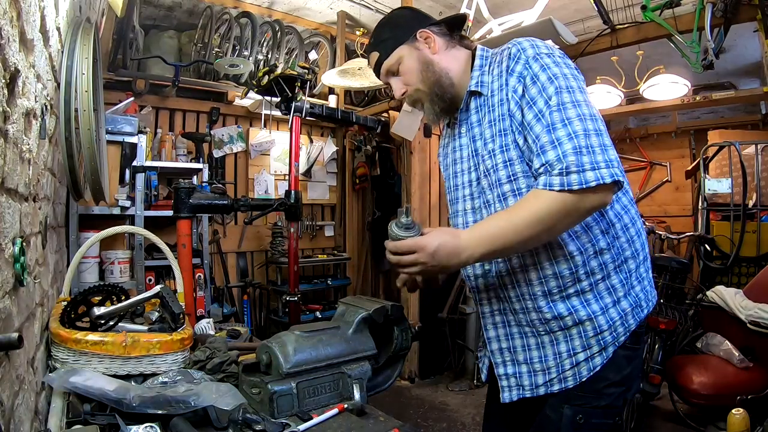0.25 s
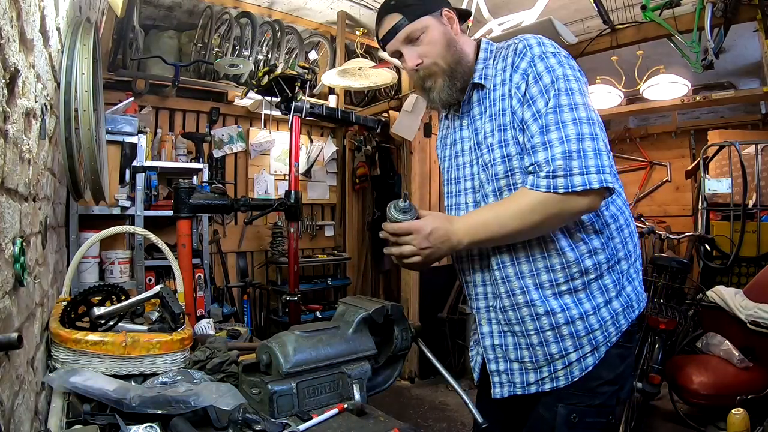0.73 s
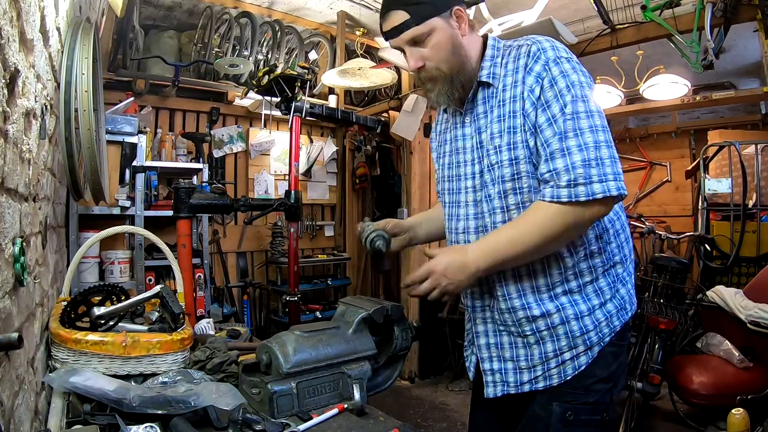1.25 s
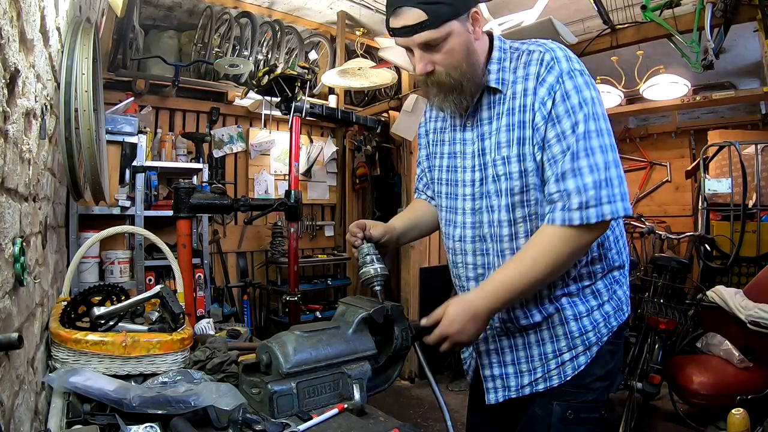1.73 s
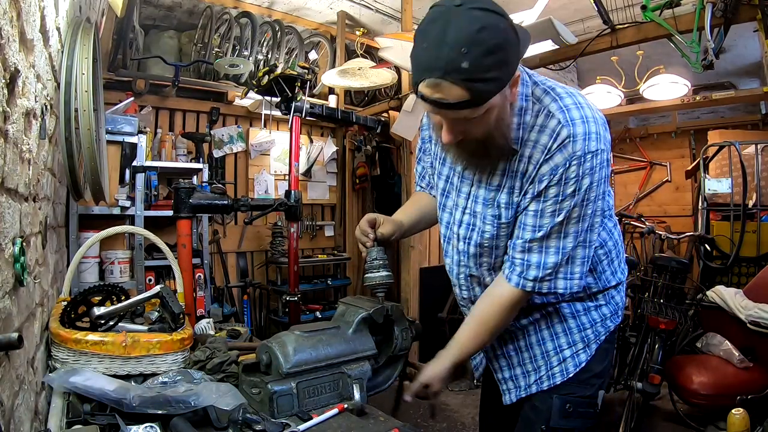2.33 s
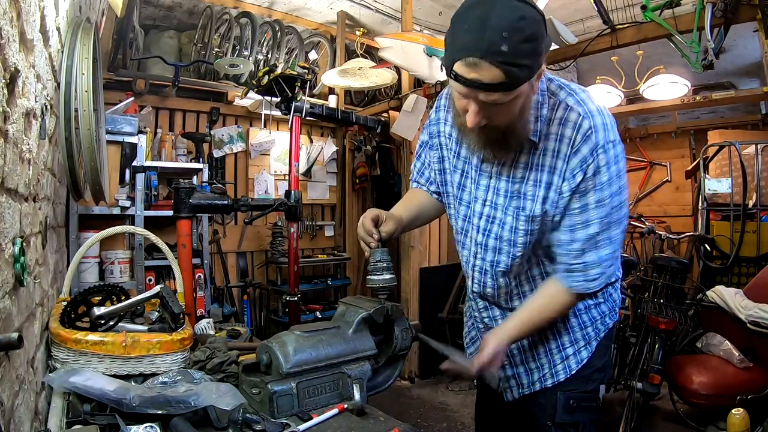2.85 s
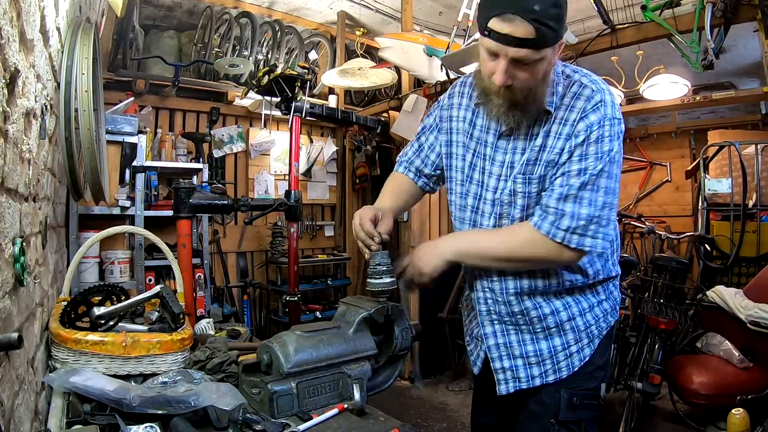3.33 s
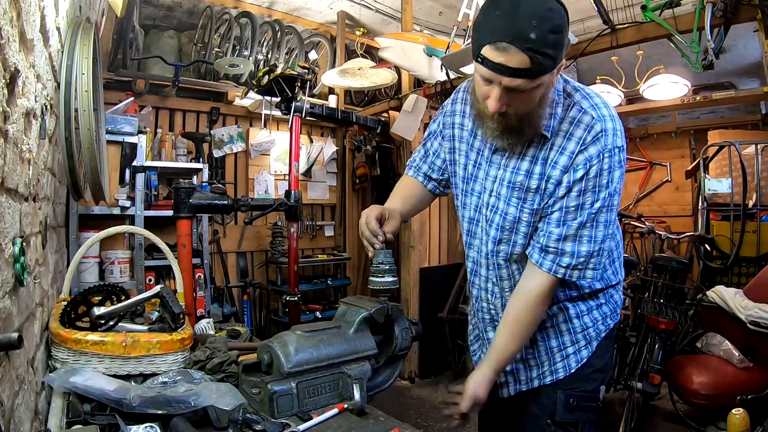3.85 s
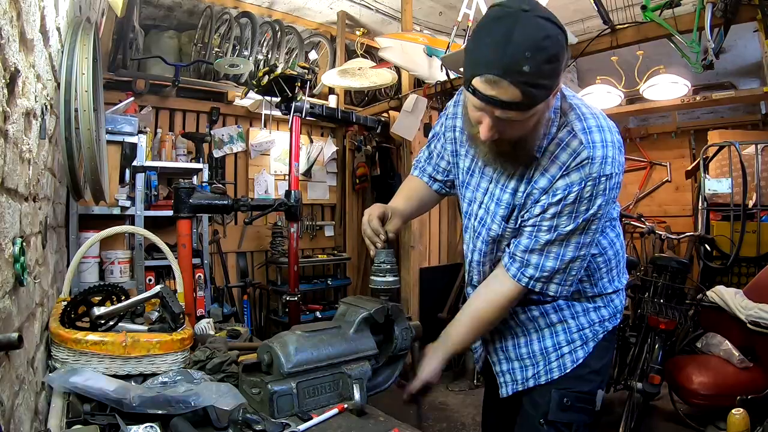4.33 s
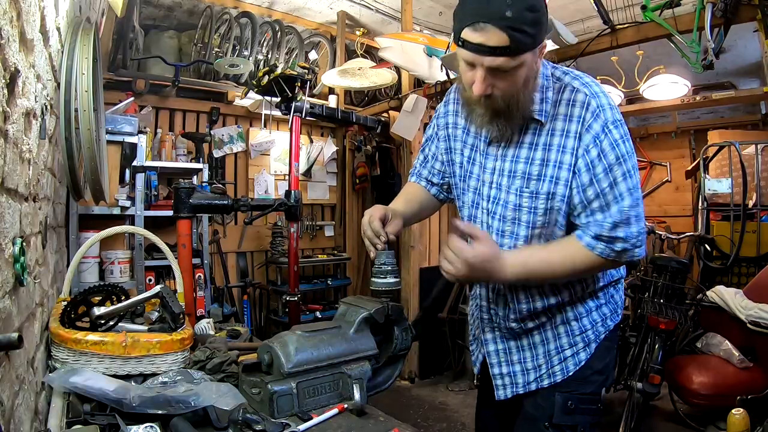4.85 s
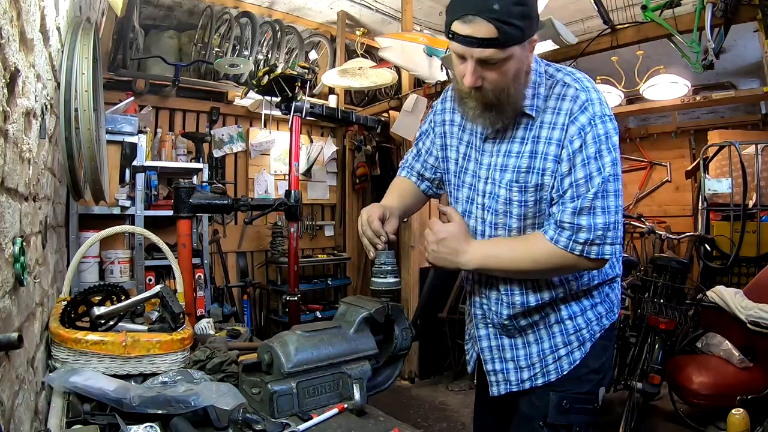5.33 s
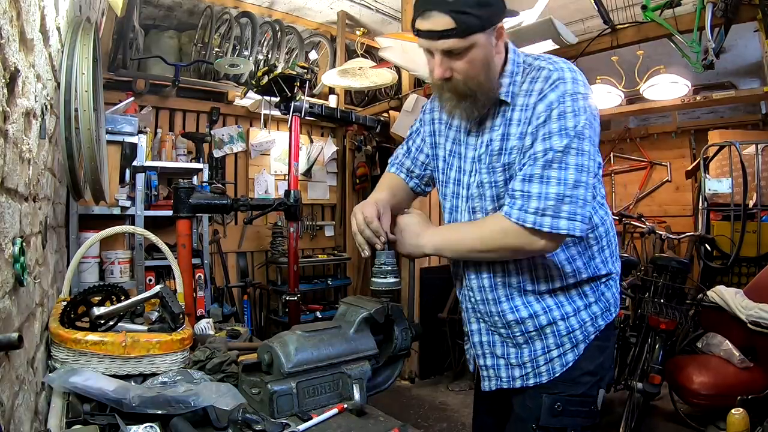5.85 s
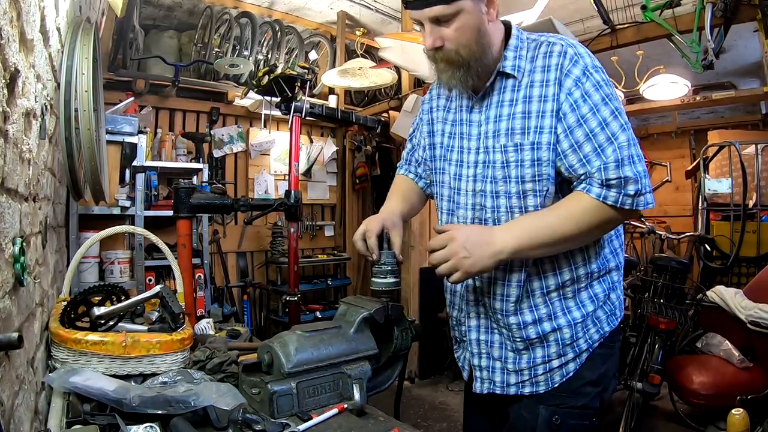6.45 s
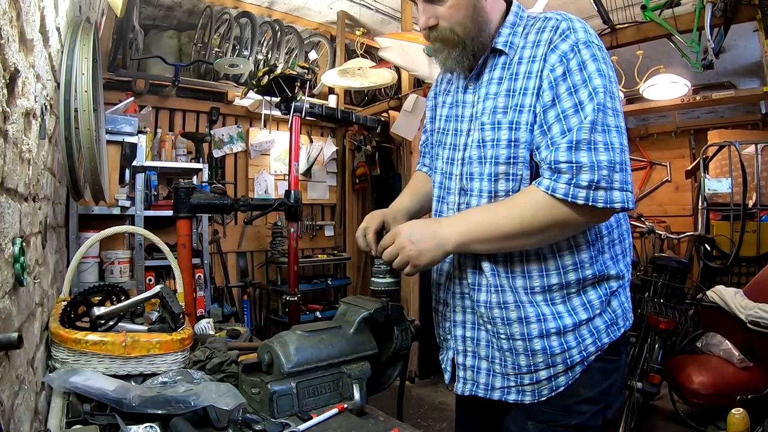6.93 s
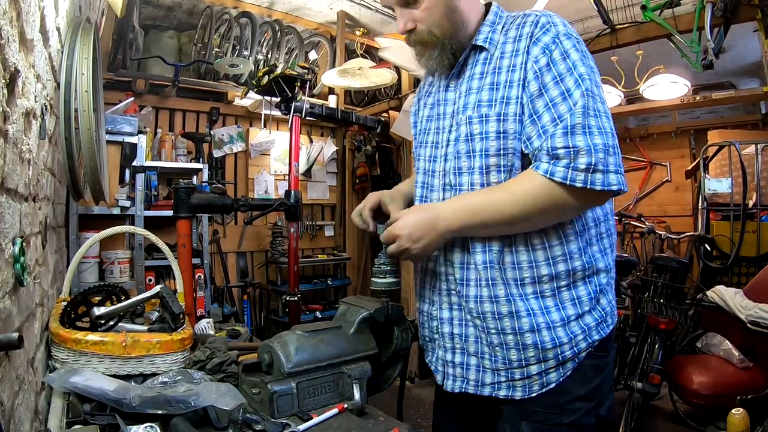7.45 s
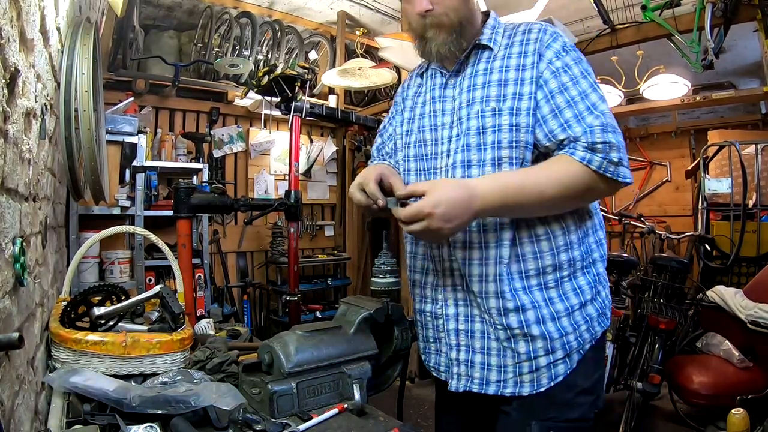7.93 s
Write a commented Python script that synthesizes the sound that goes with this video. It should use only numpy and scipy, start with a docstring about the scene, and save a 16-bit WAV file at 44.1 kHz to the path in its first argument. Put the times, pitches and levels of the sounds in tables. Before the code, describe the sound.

A bench vise is cranked by hand in a small wooden workshop, the metal near and slightly right. Light steel knocks come at the start, 0.3, 0.7 and 1.8 seconds. Knocks and low bench thumps build to a sharp, ringing clank at 2.6 seconds. A small gear part tinks at 3.3, then the sliding handle scrapes and rattles loudly around 3.5 while the screw grinds dully. Tiny clinks, soft bumps and faint palm and sleeve rubbing follow. One hard, damped clank with a short scrape lands at 5 seconds. After more tinks near 6, the biggest cluster of clanks, scraping and bright ringing runs from 6.2 to 6.4, shaking the bench and leaving a brief, fading low tone. A light click at 7 seconds and a few soft taps and rubs finish. A faint room hiss lies underneath, dipping after loud blows.

```python
"""Steel clanks, rings and scrapes as a bench vise is cranked by hand in a small wooden workshop.
The sliding handle bar strikes, rattles the casting, scrapes through its eye and shakes the bench,
while loose gear parts tink in the other hand. Palm and sleeve rub; the screw grinds dully.
A faint room hiss sinks after loud blows, as under automatic gain."""
import sys
import numpy as np
from scipy import signal
from scipy.fft import rfft, irfft, next_fast_len
from scipy.io import wavfile
from scipy.ndimage import map_coordinates

SR = 44100
rng = np.random.default_rng(int(sys.argv[2]) if len(sys.argv) > 2 else 0)


def transcribe(u):
    """Save the signal u as a 16-bit wav file named by the first command-line argument.

    u: samples, shape (n,) or (channels, n), limited to [-1, 1]; the rate is SR.
    q: integer samples, one column per channel.
    """
    v = np.clip(np.atleast_2d(u).T, -1, 1)
    q = np.round(v * 32767).astype(np.int16)
    wavfile.write(sys.argv[1], SR, q)


N = 361619

# bar strikes: (time [s], crack [dB], casting [dB], wood [dB], ring [dB], place struck [bar lengths])
STRIKES = [(0.0024, -23.5, -27, -29.5, -30.5, 0.3), (0.3294, -26.0, -23.5, -28.5, -27.5, 0.35),
           (0.7207, -26.5, -27, -37, -37, 0.36), (1.8286, -21, -27.5, -31, -32, 0.31),
           (2.2507, -23.5, -28.5, -26.5, -43.5, 0.49), (2.4185, -29, -19.5, -26.5, -50.5, 0.14),
           (2.591, -10, -13.5, -19.5, -15.5, 0.074), (3.0876, -46, -26, -37.5, -39, 0.31),
           (3.2177, -51.5, -36.5, -40, -50.5, 0.1), (3.2555, -50, -29.5, -48.5, -41, 0.082),
           (3.3622, -23.5, -27, -43, -33.5, 0.48), (3.3887, -41.5, -24.5, -35.5, -43.5, 0.42),
           (3.4814, -27.5, -18, -34, -23, 0.49), (3.491, -16.5, -13, -25.5, -16.5, 0.24),
           (3.5094, -18.5, -12, -23.0, -17.5, 0.38), (3.5295, -19, -17.5, -19.5, -18.5, 0.36),
           (3.569, -14.5, -15.5, -17, -18.5, 0.19), (3.5935, -29, -26.5, -27.5, -22.5, 0.325),
           (3.6309, -38.5, -27.5, -26, -42, 0.35), (4.8057, -33, -31.5, -37.0, -52, 0.2),
           (5.0464, -15.5, -8.5, -19.5, -31, 0.28), (5.0753, -28, -26, -29.5, -52.5, 0.5),
           (6.1161, -52, -31.5, -33.5, -52, 0.27), (6.1575, -34.5, -21, -35.5, -36.5, 0.49),
           (6.1921, -26.5, -14, -23, -42.5, 0.24), (6.2136, -24.5, -11.5, -22, -33.5, 0.49),
           (6.2277, -14, -13.0, -30.5, -23.5, 0.18), (6.2591, -13.5, -13.5, -24.5, -21, 0.5),
           (6.3004, -23, -11, -26, -18, 0.045), (6.322, -16.5, -20, -28, -24.5, 0.215),
           (6.3788, -8.5, -16.5, -18.5, -20.5, 0.097), (6.3985, -32, -25, -37, -16.5, 0.075)]
# dull contacts, bar held still: (time [s], crack [dB], casting [dB], wood [dB])
HELD_BUMPS = [(0.0997, -35, -35.5, -35.5), (0.4194, -38.5, -35.5, -36.5), (1.1637, -65, -48.5, -55),
              (1.1961, -61, -46, -53), (1.3313, -44, -32.5, -32), (1.5788, -74, -48.5, -57),
              (1.7804, -46, -43, -40.5), (1.9235, -48, -35, -29), (2.2988, -47, -34.5, -31.5),
              (3.046, -46.5, -50, -51), (3.705, -46, -29.5, -25.5), (4.2215, -44.5, -53, -64),
              (4.3187, -46, -40.5, -43), (4.4388, -38.5, -35, -33), (4.4544, -38, -35, -26.5),
              (4.5486, -44, -34, -35.5), (4.8678, -40.5, -40.5, -45.5), (4.9541, -61, -47.5, -40),
              (5.7013, -52.5, -45, -47), (5.7435, -46.5, -36, -28.5), (5.7832, -43, -33.5, -38.5),
              (5.8062, -37, -31.5, -33), (6.025, -40, -27.5, -31), (6.0703, -43.5, -29, -30),
              (6.6297, -50.5, -39.5, -43), (7.0191, -25.5, -44, -48), (7.209, -52, -53, -57),
              (7.3143, -46.5, -45, -48.5), (7.3302, -43, -36, -40.5), (7.451, -45, -45.5, -56),
              (7.4798, -44.5, -47, -56), (7.99, -60.5, -67, -62)]
# modes of bench, casting and bar: (frequency [Hz], relative level [dB], t60 [s])
VISE_MODES = [(236.2, -11, 0.22), (305, -20, 0.43), (371, -23, .15), (483.4, 0, .2), (710, -6.5, 0.15),
              (1065, -13, 0.13), (1323, -8.5, 0.17), (1393, -10.5, 0.12), (1672, -11, 0.18),
              (1900, -22, 0.091), (2396, -11, 0.24), (3070, 0.5, 0.23), (3230, -4, 0.09), (3590, -9, 0.21),
              (3655, -9.5, 0.26), (5050, 5, 0.19), (5140, -9, 0.26), (5340, -9.5, .35), (6030, -10.5, 0.36),
              (7170, -12, 0.3), (7385, 6, 0.21), (7492, -1.5, 0.32), (8640, -18, .2), (10116, 8.5, 0.24),
              (13160, -9.5, .26), (13920, -6, .3)]
# noise spectra of steel contact, casting rattle, light friction: (frequency [Hz], density [dB])
CRACK_SPECTRUM = [(1180, -37), (2000, -19.5), (3110, -8.5), (4560, -7.5), (5140, -4), (7590, -9.5),
                  (9000, -27.5), (11700, -64), (19800, -120)]
CASTING_SPECTRUM = [(470, -31.5), (800, -6.5), (884, -3), (1130, -3), (1430, 0.5), (1710, -3), (2280, -9),
                    (2470, -13), (2750, -11), (3000, -12.5), (3900, -27), (6600, -120)]
FRICTION_SPECTRUM = [(710, -45), (1200, -5), (2310, 1), (3820, -0.5), (6050, 3.5), (8710, -7), (10400, -8),
                     (14300, -32), (15500, -49.5)]
# phase lead of the left channel: (frequency [Hz], lead [rad])
LEFT_LEAD = [(0, 0), (1030, 0.5), (4220, -0.5), (6030, 1.5), (7670, 1.5), (9820, 6.5), (15200, 4)]
PAN_DB = -2  # left minus right: the metal sits to the right


def vise():
    """Each contact cracks, rattles the casting and knocks the wood; a free bar also rings."""
    # spectra of steel snap, hollow wood, low knock: (frequency [Hz], density [dB])
    snap_spectrum = [(6000, -43), (8500, 2), (10500, 5), (13000, -21.5), (15600, -26.5)]
    hollow_spectrum = [(240, -32), (400, -7), (448, 0.5), (506, -2), (602, -9), (714, 0.5), (800, -11.5),
                       (1040, -43), (1760, -120)]
    knock_spectrum = [(82, -31.5), (140, -0.5), (329, -1), (420, -7), (550, -31.5), (920, -120)]
    times, crack_db, casting_db, wood_db = contacts()
    snap_db = crack_db - 25.5 + 0.89 * (crack_db - casting_db)  # harder hits snap more
    is_bump = np.arange(len(times)) >= len(STRIKES)
    hollow_db = wood_db - 2.5 + 2 * is_bump  # dull bumps sound a little more hollow
    snap = bursts(times, snap_db, t60_s=0.079, rise_s=0.001) * noise(colour(snap_spectrum))
    crack = bursts(times, crack_db, t60_s=0.083, rise_s=0.00098) * noise(colour(CRACK_SPECTRUM))
    casting = bursts(times, casting_db, t60_s=0.09, rise_s=0.002) * noise(colour(CASTING_SPECTRUM))
    hollow = bursts(times, hollow_db, t60_s=0.14, rise_s=0.0016) * noise(colour(hollow_spectrum))
    knock = bursts(times, wood_db, t60_s=0.17, rise_s=0.0068, pan_db=0) * noise(colour(knock_spectrum))
    # the clank's noise is rolled off above 10 kHz
    clank = filtered(crack + casting + hollow + knock, lambda hz: 1 / (1 + (hz / 10000) ** 12))
    return snap + clank + bar_ring()


def bar_ring():
    """The place struck weights the bar's bending modes; wood and casting ring the rest."""
    # free bar bending: (order, frequency [Hz], relative level [dB])
    bending = [(3, 3500, 6), (4, 5040, 4), (5, 7140, -1), (6, 10100, -15)]
    # damping by the hand: (time [s], loss [dB/s])
    grip = [(0, 90), (2.7, 89.5), (3.0, 5.5), (3.7, 5), (4.8, 119), (5.1, 120.5), (6.1, 4.5)]
    node_leak, wood_hz, casting_hz = 0.11, 560, 1500
    order, bend_hz, bend_db = np.transpose(bending)
    times, crack_db, casting_db, wood_db, ring_db, place = np.transpose(STRIKES)
    hz = np.array(VISE_MODES)[:, 0]
    shape = np.abs(np.cos(np.outer(place, order + 0.5) * np.pi + np.pi / 4)) + node_leak
    anchor_hz = np.r_[wood_hz, casting_hz, bend_hz]
    anchor_db = np.c_[wood_db, casting_db, ring_db[:, None] + bend_db + 20 * np.log10(shape)]
    bar_db = [along(np.c_[anchor_hz, row], hz) for row in anchor_db]
    detune = np.abs(hz[:, None] / bend_hz - 1).min(axis=1)
    in_casting = (detune > 0.055) & (hz > 2000) & (hz < 9000)
    mode_db = np.where(in_casting, (crack_db + casting_db)[:, None] / 2 - 7.5, bar_db)
    loss_db_s = np.interp(times, *np.transpose(grip))
    return rings(times, mode_db, VISE_MODES, loss_db_s, scatter_db=2.16, rough=0.7, flutter_hz=60)


def bar_scrape():
    """Steel scrapes in the eye; the last stroke ends in the bar's fading ring."""
    # one list a stroke: (time [s], level [dB])
    strokes = [
        [(3.1, -57.5), (3.3, -41), (3.47, -44), (3.55, -34), (3.75, -52)],
        [(4.95, -57.5), (5.03, -36.5), (5.05, -38)],
        [(6.05, -62), (6.2, -44.5), (6.38, -29), (6.55, -37.5), (6.7, -87)],
    ]

    def high_modes(f, width_hz=45):
        return sum(amp(db - hz / 600) * resonance(f, hz, width_hz) ** 2
                   for hz, db, _ in VISE_MODES if hz > 2300)

    envelope = sum(amp(level_curve(stroke)) for stroke in strokes)
    chatter = unit_rms(amp(2.4 * wobble(60)))
    ring = amp(-0.5) * noise(high_modes)
    grit = amp(-2) * noise(colour(CRACK_SPECTRUM))
    casting = amp(-4) * noise(colour(CASTING_SPECTRUM))
    return envelope * chatter * (ring + grit + casting) * pan(PAN_DB)


def gear_tinks():
    """Small hardened parts touch: a tick, then the modes near each part's pitch."""
    # touches: (time [s], tick [dB], ring [dB], part pitch [Hz])
    tinks = [(2.205, -41, -41.5, 9400), (3.317, -23, -20, 4480), (3.8823, -40.5, -27, 5500),
             (3.921, -49.5, -48, 11000), (3.936, -51, -38.5, 11200), (3.998, -48, -42.5, 8400),
             (4.0432, -51.5, -47, 8500), (5.7022, -37.5, -44.5, 9700), (6.0248, -29.5, -29, 4480),
             (6.05, -35.5, -39, 4480), (6.195, -31, -32.5, 4480)]
    # gear modes: (frequency [Hz], relative level [dB], t60 [s])
    modes = [(4480, -2, 0.066), (7950, -2.5, 0.17), (8540, -0.5, 0.16), (9450, -10, 0.11), (9900, -11, .15),
             (10900, -8, .14), (10900, 2, 0.098), (13010, -7, 0.097), (15020, 5.5, .15)]
    times, tick_db, ring_db, pitch_hz = np.transpose(tinks)
    tick = bursts(times, tick_db, t60_s=0.043, rise_s=0.00064) * noise(colour(FRICTION_SPECTRUM))
    octaves_off = np.abs(np.log2(np.array(modes)[:, 0] / pitch_hz[:, None]))
    mode_db = ring_db[:, None] - 29.5 * octaves_off
    loss_db_s = np.full(len(times), 90)
    return tick + rings(times, mode_db, modes, loss_db_s, scatter_db=3, rough=0.6, flutter_hz=40)


def bench():
    """The top booms in three low modes after each jolt and drones after each knock."""
    # pushes on the handle: (time [s], level [dB])
    jolts = [(0, -22), (0.349, -35.5), (.76, -51), (1.34, -39.5), (1.88, -32), (2.25, -17), (2.479, -20),
             (2.6, -16), (3.2, -40.5), (3.28, -36), (3.41, -30), (3.55, -16.5), (3.7, -24.5), (4.35, -28.5),
             (4.48, -31.5), (4.95, -39), (5.05, -20), (5.72, -37.5), (5.9, -44.5), (6.1, -33.5),
             (6.19, -24.5), (6.279, -25), (6.38, -20), (7.02, -40.5)]
    # bench top modes: (frequency [Hz], width [Hz], level [dB])
    modes = [(60, 57, -9), (104.7, 12, 4.5), (141.4, 12, -5.5)]

    def wood(f):
        response = sum((-1) ** k * amp(db) * resonance(f, hz, width_hz)
                       for k, (hz, width_hz, db) in enumerate(modes))
        return response / (1 + (f / 170) ** 4)

    boom_gain = bursts(*np.transpose(jolts), t60_s=0.45, rise_s=0.012, pan_db=0) + amp(-66)
    times, _, _, wood_db = contacts()
    drone_gain = bursts(times, wood_db - 12, t60_s=0.4, rise_s=0.012, pan_db=0)
    drone_gain += amp(-62.5 + 1.9 * wobble(7.5))  # floor between knocks
    rumble = noise(colour([(12, -43.5), (28, -11.5), (45, 5.5), (70, -4.5), (100, -66.5)]))
    drone = noise(colour([(110, -39), (150, 8), (200, -1), (270, -6), (340, -47.5)]))
    tone_hz = modes[1][0] * (1 + 0.03 * wobble(5))
    tone = amp(-3.5) * np.sin(2 * np.pi * np.cumsum(tone_hz) / SR)
    boom = tone + noise(wood) + amp(-15.5 + 3 * wobble(8)) * rumble
    return boom_gain * boom + drone_gain * drone


def low_note(start_s=6.39, hz=275, db=-21.5, t60_s=0.79):
    """One decaying sine rings out after the last big blow."""
    t = np.maximum(np.arange(N) / SR - start_s, 0)
    return amp(db - 60 * t / t60_s) * np.sin(2 * np.pi * hz * t)


def rubbing():
    """Palm and sleeve friction swells, then fades faster, over a faint rustle."""
    # swishes: (peak time [s], nominal length [s], skin [dB], cloth [dB])
    swishes = [(2.08, 0.63, -53.5, -73.5), (2.873, .28, -47, -55), (3.099, 0.22, -57, -63.5),
               (4.229, 0.27, -58.5, -64), (4.58, 0.45, -52, -45), (4.853, 0.38, -57, -74),
               (5.317, 0.18, -64, -68), (5.795, 0.25, -48.5, -67), (6.097, 0.35, -50, -58),
               (7.192, .3, -64, -71), (7.358, 0.1, -52, -61), (7.696, 0.81, -63.5, -87.5),
               (8.04, 0.23, -65, -70.5)]
    # sleeve friction: (frequency [Hz], density [dB])
    cloth_spectrum = [(3000, -42.5), (4800, -4), (6500, 2.5), (8300, -8), (10300, -7), (13500, -20.5),
                      (15500, -29.5)]
    t = np.arange(N) / SR
    envelope = amp([[-71], [-79]])  # skin, cloth at rest
    for peak_s, length_s, skin_db, cloth_db in swishes:
        flank_s = length_s / 2 * np.where(t > peak_s, 0.66, 1)
        fall_db = 13 * ((t - peak_s) / flank_s) ** 2
        envelope = envelope + amp([skin_db - fall_db, cloth_db - fall_db])
    skin, cloth = envelope * amp(1.3 * wobble(25))
    return skin * noise(colour(FRICTION_SPECTRUM)) + cloth * noise(colour(cloth_spectrum))


def screw_grind():
    """The turning screw grinds in dull lumps."""
    # grind envelope: (time [s], level [dB])
    levels = [(0.0, -28.5), (0.13, -73), (1.83, -81), (1.94, -47), (2.49, -47.5), (2.81, -57),
              (3.13, -56.5), (3.24, -46.5), (3.61, -26), (3.82, -64.5), (4.29, -62), (4.47, -55.5),
              (5.11, -50), (5.71, -70.5), (5.94, -50.5), (6.32, -32.5), (6.74, -63.5), (6.96, -88.5),
              (7.31, -65.5), (8.2, -79)]
    # grind noise: (frequency [Hz], density [dB])
    spectrum = [(160, -33.5), (280, -2.5), (405, -5), (478, -3.5), (607, -14), (733, -6.5), (915, -20),
                (1100, -8), (2000, -24), (2600, -48.5), (4400, -120)]
    return amp(level_curve(levels) + 6.7 * wobble(16)) * noise(colour(spectrum))


def shop_reverb(x):
    """Room tail: treble dies first; bass reaches both channels alike."""
    # room decay: (frequency [Hz], t60 [s])
    decay = [(150, 0.44), (1000, 0.34), (5000, 0.3), (12000, 0.18)]
    hz, t, (mid, side) = signal.stft(rng.standard_normal((2, SR // 2)), SR, nperseg=512)
    width = 1 / (1 + (450 / (hz[:, None] + 1)) ** 4)
    mid, side = mid * np.sqrt(2 - width), side * width
    fade = amp(-60 * t / along(decay, hz)[:, None])
    _, tail = signal.istft(np.array([mid + side, mid - side]) * fade, SR, nperseg=512)
    delayed = np.pad(x, ((0, 0), (250, 0)))
    return signal.fftconvolve(delayed, tail / np.linalg.norm(tail[0]), axes=1)[:, :N]


def room_hiss():
    """Quiet, diffuse background noise."""
    # room noise: (frequency [Hz], density [dB])
    spectrum = [(18, -32.5), (30, -3), (130, 0), (576, -17.5), (788, -9), (1050, -14.5), (2760, -25.5),
                (5900, -25), (10200, -40.5), (13600, -49.5), (15500, -62)]
    # diffuse field: (frequency [Hz], left-right coherence)
    diffuse = [(60, 0.97), (300, 0.44), (640, .05), (3000, 0.29), (15000, .05)]
    return amp(-55.5) * noise(colour(spectrum), diffuse)


def contacts():
    """Strikes, then held bumps, as columns: time, crack, casting, wood."""
    return np.vstack([np.array(STRIKES)[:, :4], HELD_BUMPS]).T


def bursts(times, db, t60_s, rise_s, pan_db=PAN_DB):
    """Stereo envelope: fast rise, exponential decay; powers add."""
    kicks = np.zeros(N)
    np.add.at(kicks, (times * SR).astype(int), amp(db) ** 2)
    t = np.arange(SR // 2) / SR
    shape = amp(-60 * t / t60_s) * (1 - np.exp(-t / rise_s))
    return pan(pan_db) * np.sqrt(np.abs(signal.fftconvolve(kicks, shape ** 2)[:N]))


def rings(times, mode_db, modes, loss_db_s, scatter_db, rough, flutter_hz):
    """Modes ring at mode_db (blows x modes); loose parts make them flutter, a hand damps them."""
    hz, level_db, t60_s = np.transpose(modes)[:, :, None]
    t = np.arange(SR) / SR
    knots = rng.standard_normal((2, 2, len(modes), 2 * flutter_hz))
    flutter = 1 + rough * signal.resample(knots[0] + 1j * knots[1], SR, axis=-1)
    tones = (flutter * phase_lead(hz) * np.exp(2j * np.pi * hz * t)).imag / np.sqrt(1 + 2 * rough ** 2)
    length = SR // 2
    t = t[:length]
    decay = amp(level_db - 60 * t / t60_s) * (1 - np.exp(-t / 0.00067))
    out = np.zeros((2, N + SR))
    for time_s, db, loss in zip(times, mode_db, loss_db_s):
        gains = amp(db + scatter_db * rng.standard_normal(len(modes)))
        offset = rng.integers(length)
        ring = np.einsum("m,mt,cmt->ct", gains, decay, tones[..., offset:offset + length])
        onset = int(time_s * SR)
        out[:, onset:onset + length] += ring * amp(-loss * t)
    return pan(PAN_DB) * out[:, :N]


def noise(response, coherence=None):
    """Partly coherent stereo noise, rms 1."""
    # near sources: (frequency [Hz], left-right coherence)
    near = [(60, 0.98), (300, 1), (600, 0.74), (1650, 0.28), (5000, 0.27), (15000, 0.2)]

    def mid_side(hz):
        angle = np.arccos(np.clip(along(coherence or near, hz), -1, 1)) / 2
        return response(hz) * [np.cos(angle), np.sin(angle)]

    mid, side = filtered(rng.standard_normal((2, N)), mid_side)
    return unit_rms(filtered(np.array([mid + side, mid - side]), phase_lead))


def filtered(x, response):
    size = next_fast_len(N + SR // 2)
    return irfft(rfft(x, size) * response(np.fft.rfftfreq(size, 1 / SR)), size)[..., :N]


def resonance(f, centre_hz, width_hz):
    return 1j * f * width_hz / (centre_hz ** 2 - f ** 2 + 1j * f * width_hz)


def colour(spectrum):
    """Gain function from (Hz, dB) points."""
    return lambda hz: amp(along(spectrum, hz))


def along(points, hz):
    """Interpolate (Hz, value) points on a log axis."""
    knot_hz, values = np.transpose(points)
    return np.interp(np.log(hz + 1), np.log(knot_hz + 1), values)


def level_curve(points):
    """dB per sample from (s, dB) points; silent outside."""
    return np.interp(np.arange(N) / SR, *np.transpose(points), left=-120, right=-120)


def wobble(rate_hz):
    """Smooth random curve."""
    knots = rng.standard_normal(int(N * rate_hz / SR) + 4)
    return map_coordinates(knots, [np.arange(N) * rate_hz / SR])


def phase_lead(hz):
    return np.exp(1j * np.multiply.outer([0.5, -0.5], along(LEFT_LEAD, hz)))


def pan(db):
    return amp([[db / 2], [-db / 2]])


def amp(db):
    return 10 ** (np.asarray(db) / 20)


def unit_rms(x):
    return x / np.sqrt(np.mean(x ** 2) + 1e-20)


def scene():
    """Metal with room reverb; the other sources dry."""
    metal = vise() + gear_tinks() + bar_scrape()
    return metal + amp(-7) * shop_reverb(metal) + bench() + low_note() + rubbing() + screw_grind()


def record(dry):
    """Automatic gain ducks the hiss alone after loud blows; soft clip, then low-pass."""
    memory_s, threshold_db, cutoff_hz = 0.25, -32, 15690
    memory = np.exp(-np.arange(SR) / (memory_s * SR))
    power = np.abs(signal.fftconvolve(np.mean(dry ** 2, 0), memory / memory.sum())[:N])
    mix = dry + room_hiss() / (1 + power / amp(threshold_db) ** 2) ** 0.42
    clipped = mix / (1 + np.abs(mix) ** 6) ** (1 / 6)
    return filtered(clipped, lambda hz: hz < cutoff_hz)


dry = scene()
out = record(dry)
transcribe(out)
```